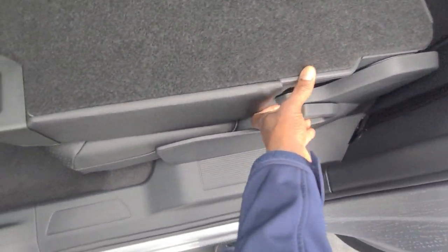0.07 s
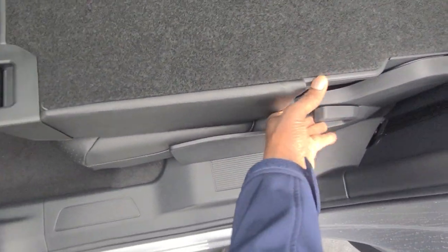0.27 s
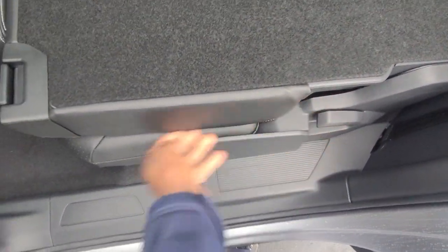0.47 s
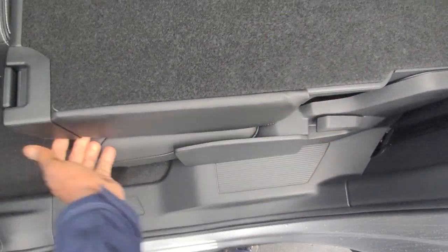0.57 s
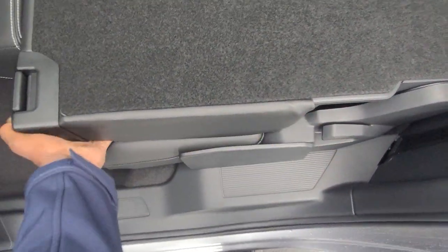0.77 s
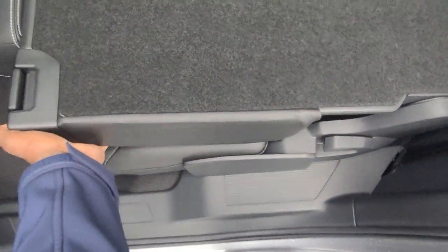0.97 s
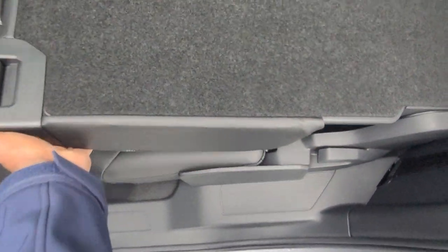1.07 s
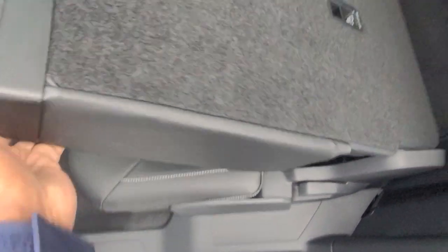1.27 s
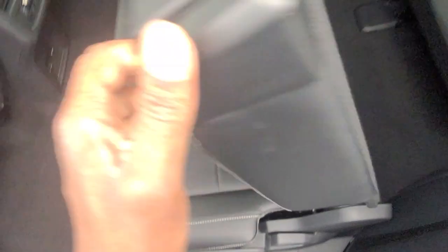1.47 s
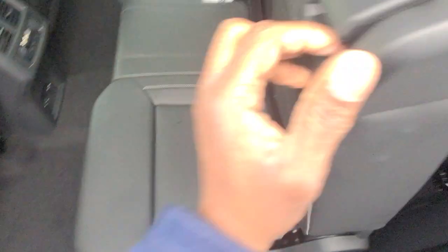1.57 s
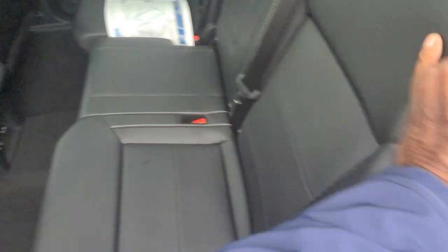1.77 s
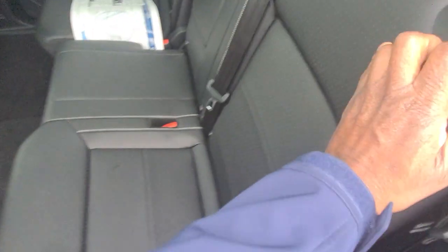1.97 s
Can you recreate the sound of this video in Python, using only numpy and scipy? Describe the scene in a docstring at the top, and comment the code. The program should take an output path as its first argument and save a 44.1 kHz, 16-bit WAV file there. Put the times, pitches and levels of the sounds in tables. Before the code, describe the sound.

Car seat back thuds and clacks into its latch after quiet hand rubbing in a humming cabin

```python
"""Two low hum tones and a dull wash of noise fill a parked cabin; hand, sleeve and upholstery rub in it.
Grains of noise make the rubbing, narrow-band friction the squeaks, and dying crackles the small catches.
Then a folding car seat back, lifted by hand, slams into its latch: a quick run of blows rings the modes
of the padded frame as thumps, with a metal rattle of short decaying tones."""
import sys
import numpy as np
from scipy import signal
from scipy.fft import rfft, irfft
from scipy.io import wavfile

SR = 44100
rng = np.random.default_rng(int(sys.argv[2]) if len(sys.argv) > 2 else 0)


def voltage_ratio(decibels):
    """Convert decibels (scalar or array-like) to amplitude ratios, 20 dB per decade."""
    exponent = np.asarray(decibels, float) / 20
    return 10 ** exponent


def output_pcm(signal):
    """Save a mono or channel-first signal as 16-bit PCM at the path in sys.argv[1].

    Samples are clipped to [-1, 1] before scaling.
    """
    pcm = np.clip(np.atleast_2d(signal).T, -1, 1) * 32767
    wavfile.write(sys.argv[1], SR, np.round(pcm).astype(np.int16))


N = 89170   # length [samples]


def at_hz(points, hz):
    """Read a (frequency, level) table on a log frequency axis."""
    table_hz, table_db = np.transpose(points)
    return np.interp(np.log(hz), np.log(table_hz), table_db)


def rms_one(x):
    """Scale to rms 1."""
    return x / np.sqrt(np.mean(x ** 2) + 1e-20)


def drift(rate_hz):
    """Slow random wander of rms 1: noise through two equal low-pass poles at rate_hz."""
    step, settle = 40, 2000   # computed once every 40 samples, after a run-in
    r = np.exp(-2 * np.pi * rate_hz * step / SR)
    noise = rng.standard_normal(N // step + settle + 2)
    slow = signal.lfilter([1], [1, -2 * r, r * r], noise)[settle:]
    return np.interp(np.arange(N) / step, np.arange(len(slow)), rms_one(slow - slow.mean()))


def coloured(source, spectrum, side, tilt_db=0):
    """Shape mid and side sources by a spectrum tilted in dB per octave; white mid of rms 1 stays near 1."""
    size = source.shape[-1]
    hz = np.maximum(np.fft.rfftfreq(size, 1 / SR), 10)
    gain = voltage_ratio(at_hz(spectrum, hz) + tilt_db * np.log2(hz / 4000))
    mid_side_gain = gain * [np.ones_like(hz), voltage_ratio(at_hz(side, hz))]
    return irfft(rfft(source) * mid_side_gain, size) / np.sqrt(np.mean(gain ** 2))


def swell(peak, rise, fall):
    """A bell in time, about 17 dB down one rise before and one fall after its peak."""
    t = np.arange(N) / SR - peak
    return np.exp(-2 * (t / np.where(t < 0, rise, fall)) ** 2)


# Blows on the frame: (time [s], level [dB], part struck [Hz], fall-off away from it [dB per octave])
FRAME_BLOWS = [(1.812, -21, 1300, 1), (1.8145, -4.5, 292, 28), (1.821, -14.5, 740, 5.5),
               (1.823, -5, 85, 25.5), (1.8524, -4.5, 360, 14.5), (1.860, -31, 77, 13),
               (1.863, -12.5, 1120, 16.5), (1.872, -4.5, 73, 27), (1.872, -17.5, 192, 16),
               (1.8978, -18.5, 870, 5), (1.898, -15, 187, 7.5), (1.905, -10, 447, 24), (1.912, -6, 102, 38),
               (1.9147, -9, 231, 18.5), (1.933, -15, 177, 7.5), (1.947, -12.5, 76, 7.0),
               (1.982, -13, 224, 11), (2.005, -9, 88, 32)]
# Modes of the seat frame and floor: (frequency [Hz], level [dB])
FRAME_MODES = [(77, -4), (105, -8), (150, -3.5), (192, 0.5), (240, 0), (305, -2), (365, -1.4), (440, -4),
               (540, -4.5), (610, -10.5), (690, -5.5), (755, -6), (815, -8), (910, -10.5), (1030, -8.5),
               (1150, -4.5), (1370, -20), (1520, -11), (1680, -0.5), (1850, -3)]
# Stereo width of the modes: (frequency [Hz], side relative to mid [dB])
FRAME_WIDTH = [(60, 2), (110, -26), (200, -13), (380, -6), (700, 3), (1290, 5), (2380, -3)]


def thumps():
    """Each blow is a brief contact force that rings the damped modes, most near the part struck."""
    lowest_t60_s, damping_power = 0.21, 0.69   # higher modes die sooner
    pivot_hz, scatter_db = 400, 1.5            # modes above the pivot are shaken unevenly
    low_cut_hz = 50.3                          # thumps are high-passed here, leaving little deep bass
    size = int(.004 * SR)                      # contact of 4 ms
    contact = 4 / size * np.hanning(size)
    out = np.zeros((2, N))
    for hz, mode_db in FRAME_MODES:
        high = hz > pivot_hz
        w = 2 * np.pi * hz / SR
        force = np.zeros((2, N + SR))
        for s, db, part_hz, fall_db in FRAME_BLOWS:
            # random phase, except in the mid of the low modes
            phase = rng.uniform(0, 2 * np.pi, (2, 1)) * [[high], [1]]
            cycle = np.sin(w * np.arange(size) + phase)
            scatter = scatter_db * high * rng.standard_normal((2, 1))
            gain = voltage_ratio(db + mode_db - fall_db * abs(np.log2(hz / part_hz)) + scatter)
            start = int(s * SR)
            force[:, start:start + size] += gain * contact * cycle
        t60 = lowest_t60_s * (FRAME_MODES[0][0] / hz) ** damping_power
        r = voltage_ratio(-60 / (t60 * SR))
        ringing = signal.lfilter([0, np.sin(w)], [1, -2 * r * np.cos(w), r * r], force[:, :N] + 1e-18)
        out += ringing * [[1], [voltage_ratio(at_hz(FRAME_WIDTH, hz))]]
    return signal.sosfilt(signal.butter(2, low_cut_hz, "high", fs=SR, output="sos"), out)


# Hard single snaps of metal on metal: (time [s], starting level [dB], frequency [Hz])
METAL_SNAPS = [(1.0206, -20, 6960), (1.0482, -16.5, 4400), (1.8502, -15, 6400), (1.8533, -7.5, 1300),
               (1.8985, -13.5, 2350), (1.9139, -9.5, 1170)]


def snaps():
    """One jolt that rings as a sine for a few cycles, at a random place in the stereo field."""
    snap_cycles = 6.5   # cycles to fall 60 dB
    out = np.zeros((2, N))
    for s, db, hz in METAL_SNAPS:
        t = np.maximum(np.arange(N) / SR - s, 0)
        ring = voltage_ratio(db - 60 * t * hz / snap_cycles) * np.sin(2 * np.pi * hz * t)
        out += ring * [[1], [rng.uniform(-1, 1)]]
    return out


# Small catches and creaks:
# (time [s], relative level [dB], t60 [s], pan, left over right [dB], brightness [dB per octave])
CATCHES = [(0.598, -33, 0.1, 1, -1.3), (0.615, -31.5, 0.028, 16, -1), (0.9963, -36, 0.19, -5, 1.7),
           (1.0216, -27, 0.069, 4, 4), (1.049, -28.5, 0.093, -8, 0.5), (1.059, -32.5, 0.12, 8, 0),
           (1.781, -44, 0.018, -18, -25), (1.81, -22, 0.29, -2, -5.5), (1.8444, -17, 0.12, 4, 5),
           (1.853, -7, 0.23, -1, -6.5), (1.864, -20.5, 0.16, 7, 5.5), (1.8978, -15.5, 0.14, 2, -3.5),
           (1.905, -18.5, 0.16, -11, -6), (1.979, -29, 0.12, -2, -4.5)]
# Colour of a catch before its brightness tilt: (frequency [Hz], relative density [dB per Hz])
CATCH_SPECTRUM = [(350, -23.5), (600, -2), (1410, 2), (3630, -4.5), (7730, -9.5), (9110, -17.5),
                  (12700, -16), (16000, -26)]
# Stereo width of catches, and of rubbing: (frequency [Hz], side relative to mid [dB])
CONTACT_WIDTH = [(200, -31), (380, 0), (700, -1.5), (1290, 6), (2380, 0.5), (8120, 0.5), (15000, -0.5)]


def clicks():
    """Each catch is a burst of coloured noise: a short crack added to a body with its own decay."""
    rise_s, crack_t60_s = 0.0004, 0.021
    size = 8192
    out = np.zeros((2, N + SR))
    t = np.arange(size) / SR
    for s, db, t60, pan_db, tilt_db in CATCHES:
        noise = rng.standard_normal((2, size))
        mid, side = coloured(noise, CATCH_SPECTRUM, CONTACT_WIDTH, tilt_db)
        body = voltage_ratio(db - 7.5 - 60 * t / t60)
        crack = voltage_ratio(db - 8 - 60 * t / crack_t60_s)
        shape = (1 - np.exp(-t / rise_s)) * (body + crack)
        lean = np.tanh(pan_db * np.log(10) / 40)   # share of mid added to side
        start = int(s * SR)
        out[:, start:start + size] += shape * [mid, side + lean * mid]
    return out[:, :N]


# Strokes of hand, sleeve and upholstery:
# (peak time [s], rise [s], fall [s], relative hiss level [dB], relative scuff level [dB])
RUB_STROKES = [(.11, 0.089, 0.065, -61, -57), (.5, 0.11, 0.21, -56.5, -55.5),
               (.575, 0.029, 0.047, -49, -45.5), (0.648, 0.037, 0.084, -54.5, -46),
               (0.763, 0.06, 0.058, -57.5, -52.5), (0.933, 0.038, 0.24, -62.5, -52),
               (1.252, 0.25, 0.096, -52.5, -49), (1.4, 0.24, 0.13, -56.5, -51),
               (1.58, 0.27, 0.48, -58.5, -51), (1.715, 0.07, 0.058, -42, -43.5),
               (1.789, 0.062, 0.18, -41, -38)]
# Bright hiss of a stroke: (frequency [Hz], relative density [dB per Hz])
HISS_SPECTRUM = [(1180, -26), (2360, -3), (3460, -9), (6640, -1.5), (7980, -8.5), (14000, -9),
                 (16000, -9.5)]
# Duller scuff of a stroke: (frequency [Hz], relative density [dB per Hz])
SCUFF_SPECTRUM = [(180, -3), (300, -1.5), (426, -3), (467, -9), (690, -5), (3500, -15.5), (4550, -23.5),
                  (7700, -120)]


def rubbing():
    """Dense grains of fibre and skin over noise: a bright hiss and a duller scuff under each stroke."""
    grains_per_s, grain_spread_db = 2000, 2.2
    out = 0
    for column, spectrum in ((3, HISS_SPECTRUM), (4, SCUFF_SPECTRUM)):
        level = np.sqrt(sum((voltage_ratio(row[column]) * swell(*row[:3])) ** 2 for row in RUB_STROKES))
        lumps = rms_one(voltage_ratio(grain_spread_db * drift(44)))
        hits = rng.random((2, N)) < grains_per_s / SR
        grains = hits * rng.standard_normal((2, N)) * np.sqrt(SR / grains_per_s)
        source = (rng.standard_normal((2, N)) + 0.69 * grains) * lumps
        out = out + level * coloured(source, spectrum, CONTACT_WIDTH)
    return out


# Skin squeaks and soft knocks on the trim:
# (peak time [s], rise [s], with the fall half as long, level [dB], frequency [Hz], bandwidth [Hz])
TRIM_SQUEAKS = [(0.571, 0.038, -41, 1660, 300), (0.765, 0.041, -47, 810, 248),
                (1.271, 0.01, -41.5, 740, 200), (1.692, 0.01, -40, 1500, 400),
                (1.706, 0.016, -42.5, 3300, 300), (1.717, 0.0054, -40.5, 1570, 400),
                (1.727, 0.017, -42.5, 2940, 300), (1.76, 0.03, -43, 3100, 500)]


def squeaks():
    """Short bursts of friction noise, each through one broad resonance."""
    out = 0
    for s, rise, db, hz, width_hz in TRIM_SQUEAKS:
        r = np.exp(-np.pi * width_hz / SR)
        poles = [1, -2 * r * np.cos(2 * np.pi * hz / SR), r * r]
        band = signal.lfilter([1, 0, -1], poles, rng.standard_normal((2, N)))
        out = out + voltage_ratio(db) * swell(s, rise, rise / 2) * rms_one(band)
    return out


# Colour of the cabin wash: (frequency [Hz], relative density [dB per Hz])
WASH_SPECTRUM = [(32, -70), (55, -4.5), (91, -10.5), (149, -19.5), (180, -19.5), (276, -24.5), (434, -26),
                 (500, -30), (767, -29), (949, -37.5), (1490, -33), (2700, -48), (16000, -60)]
# Stereo width of the wash: (frequency [Hz], side relative to mid [dB])
WASH_WIDTH = [(60, -3.5), (110, -16), (200, -8), (380, 1.5), (1000, 8), (2380, -1.5), (15000, 2.5)]


def wash():
    """Steady dull noise whose level is gently uneven."""
    level_db, patchy_db = -40.5, .8
    level = voltage_ratio(level_db + patchy_db * drift(20))
    return level * coloured(rng.standard_normal((2, N)), WASH_SPECTRUM, WASH_WIDTH)


# Hum tones: (frequency [Hz], level before waver [dB rms], level waver [dB], waver corner [Hz],
# pitch drift [Hz], pan, left over right [dB])
HUM_TONES = [(35.3, -35.5, 1.4, 5.0, .3, -2.4), (60.5, -38, 3.0, 3.0, .6, -.6)]


def hum():
    """Two low sines that waver in level and pitch, a little earlier on the right; left and right."""
    lag_s = .0005   # left after right
    out = 0
    for hz, db, waver_db, rate_hz, slip_hz, pan_db in HUM_TONES:
        phase = 2 * np.pi * np.cumsum(hz + slip_hz * drift(rate_hz)) / SR + rng.uniform(0, 2 * np.pi)
        lag = np.pi * hz * lag_s * np.array([[1], [-1]])
        level = voltage_ratio(db + waver_db * drift(rate_hz) + pan_db * np.array([[.5], [-.5]]))
        out = out + level * np.sqrt(2) * np.sin(phase - lag)
    return out


def scene():
    """Mid and side sources turned to left and right, over the hum."""
    mid, side = thumps() + snaps() + clicks() + rubbing() + squeaks() + wash()
    return np.array([mid + side, mid - side]) + hum()


def low_pass(x):
    """Removes everything above the highest recorded frequency."""
    return signal.sosfilt(signal.butter(12, 16320, fs=SR, output="sos"), x)


def record(dry):
    """The lowest bass is lost, peaks are rounded and the top is cut."""
    mic_low_hz, top_hz = 20.6, 16400
    lean = signal.sosfilt(signal.butter(2, mic_low_hz, "high", fs=SR, output="sos"), dry)
    rounded = 1.3 * np.tanh(lean / 1.3)
    cut = signal.sosfilt(signal.cheby2(12, 60, top_hz, fs=SR, output="sos"), rounded)
    return low_pass(cut)


dry = scene()
out = record(dry)
output_pcm(out)
```